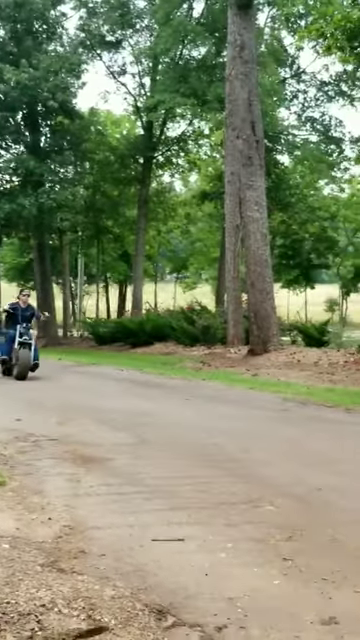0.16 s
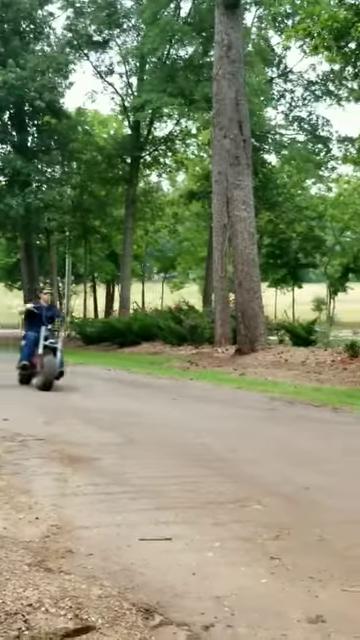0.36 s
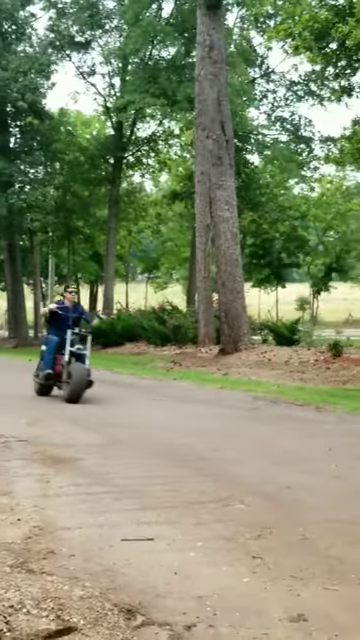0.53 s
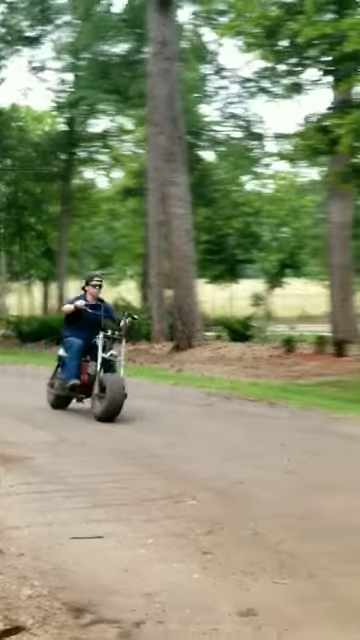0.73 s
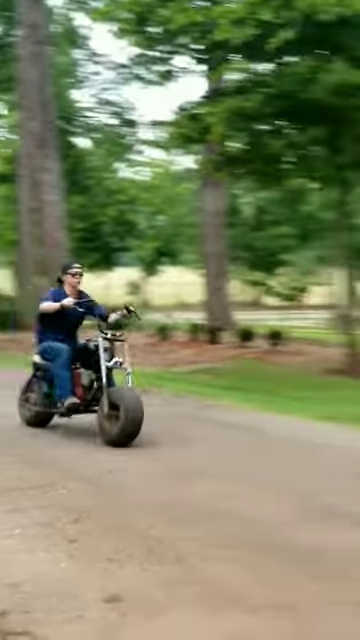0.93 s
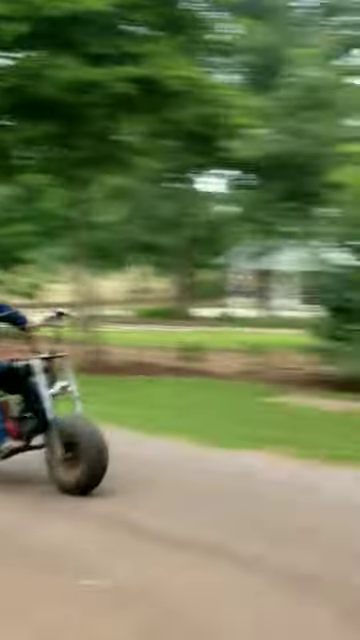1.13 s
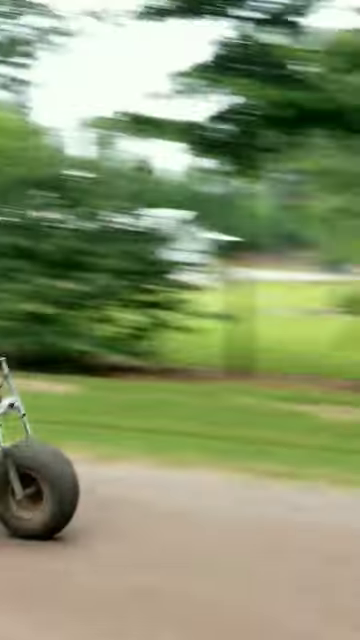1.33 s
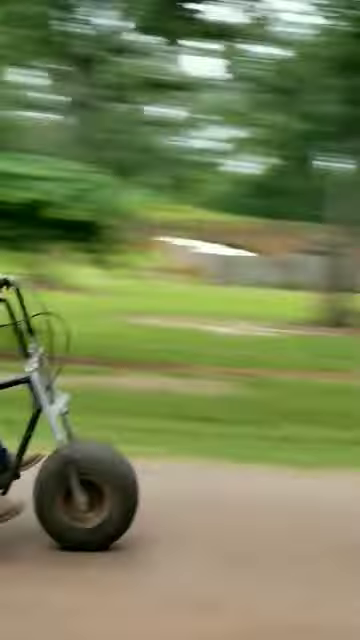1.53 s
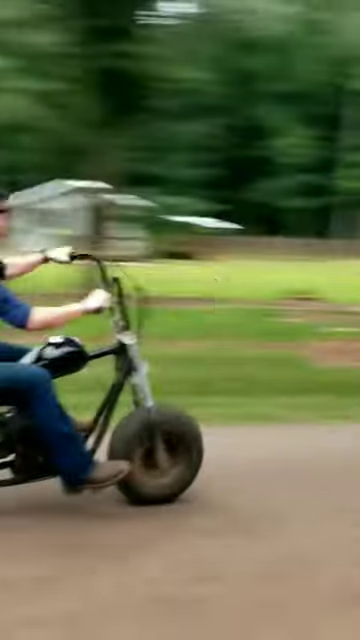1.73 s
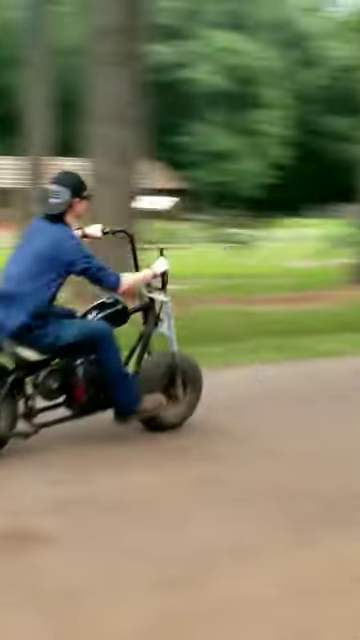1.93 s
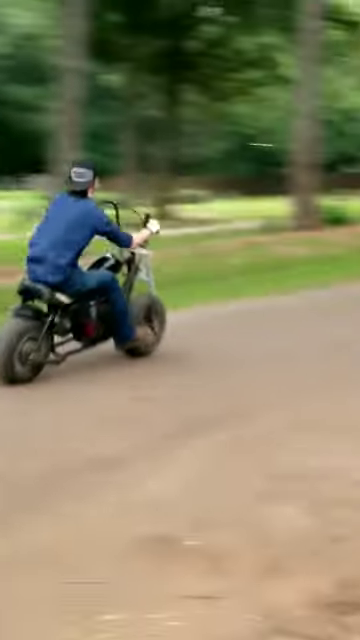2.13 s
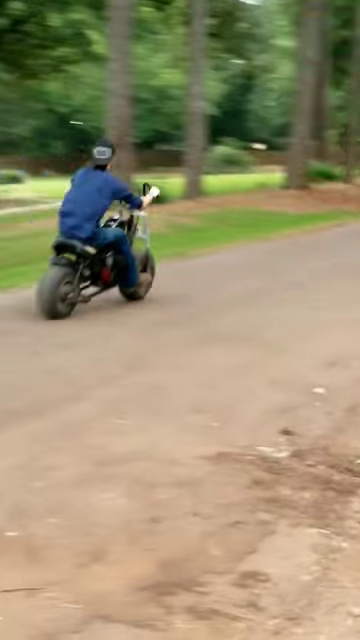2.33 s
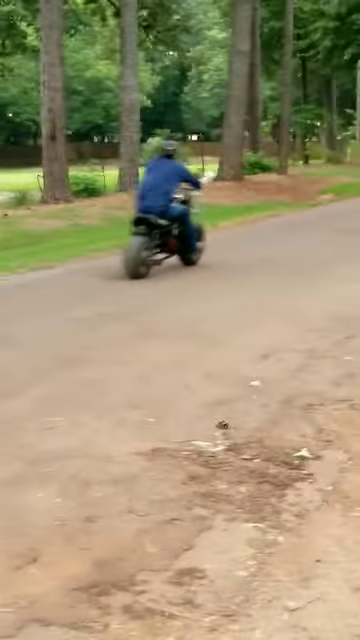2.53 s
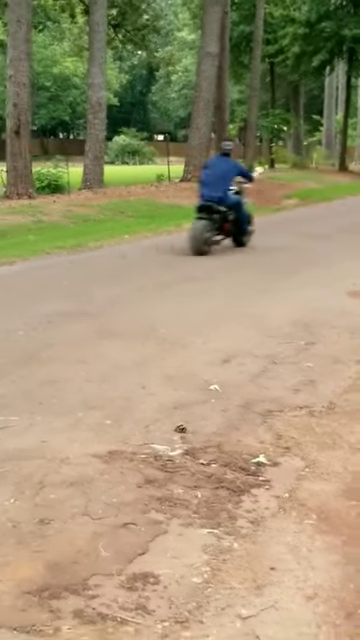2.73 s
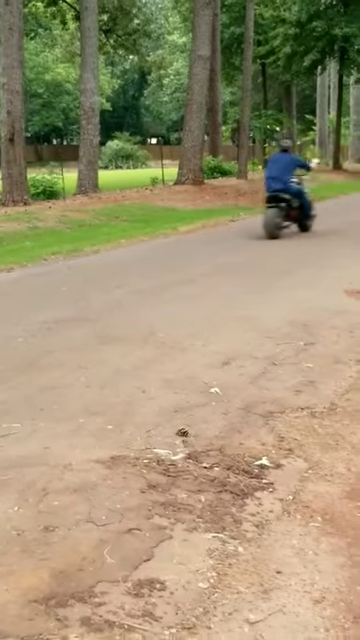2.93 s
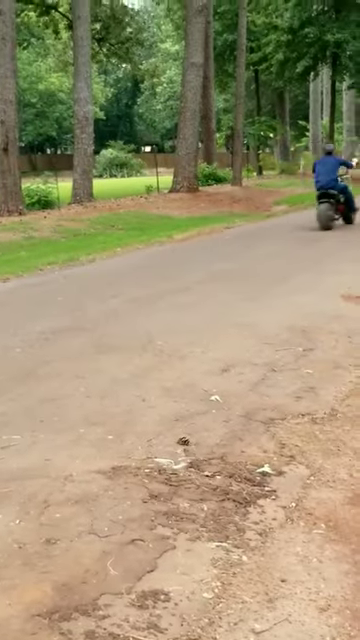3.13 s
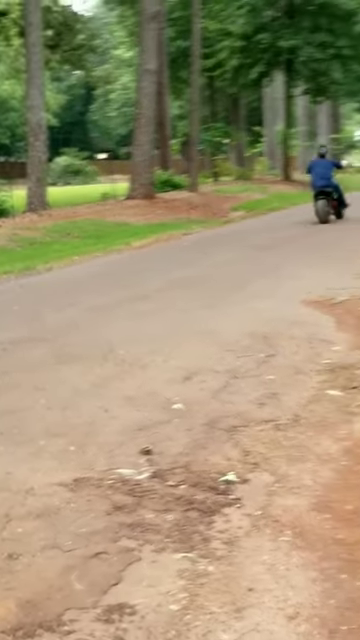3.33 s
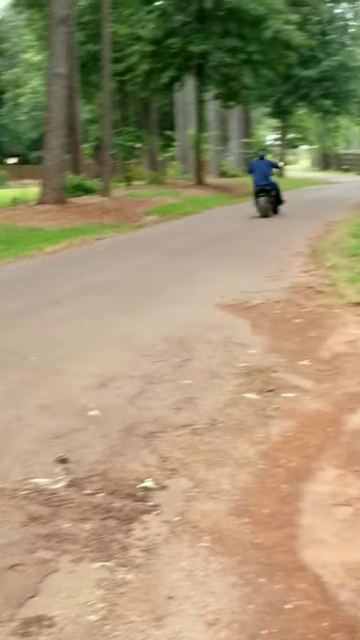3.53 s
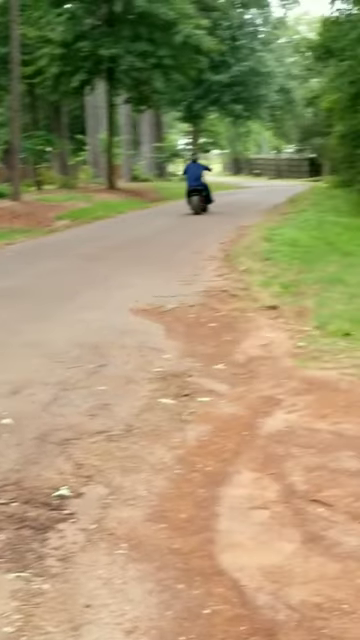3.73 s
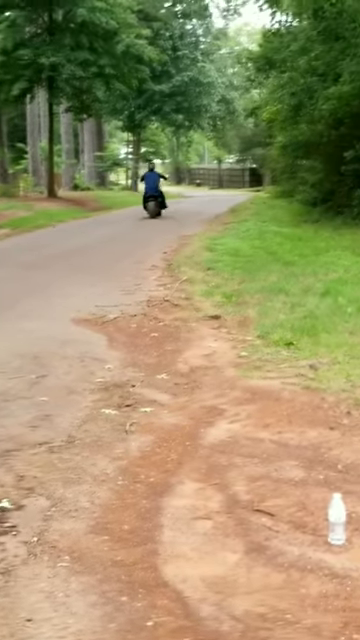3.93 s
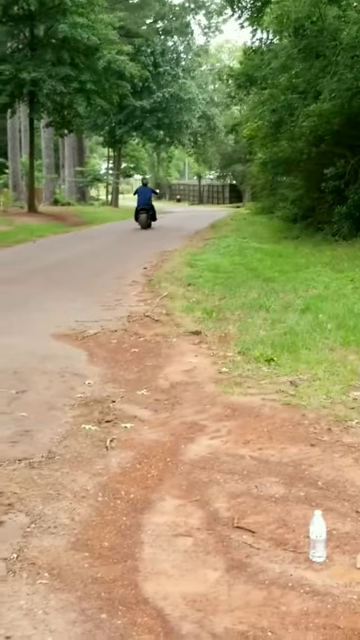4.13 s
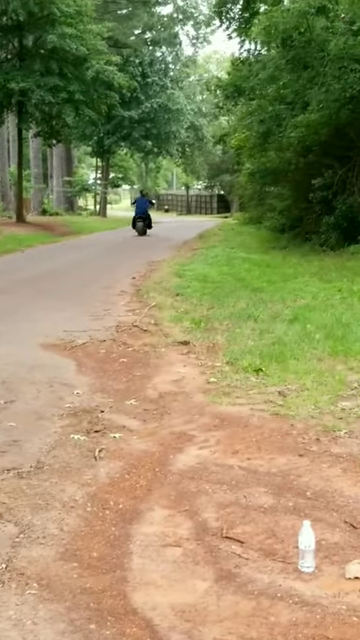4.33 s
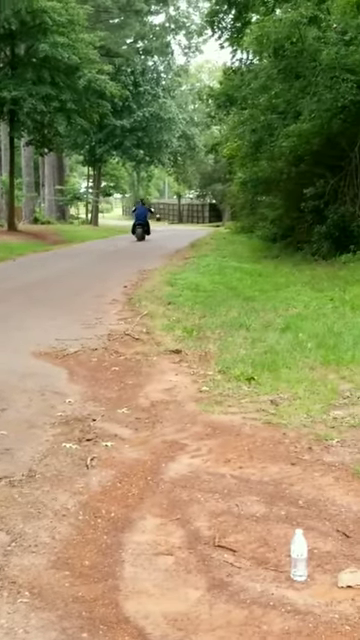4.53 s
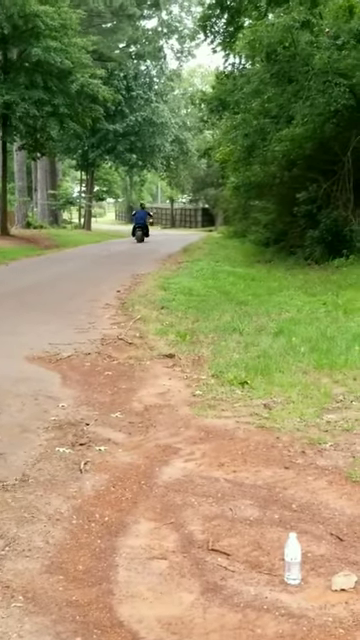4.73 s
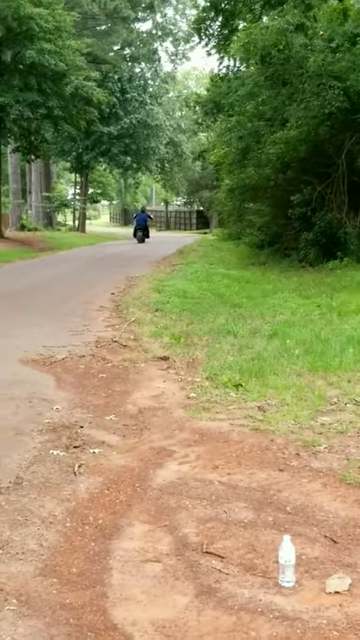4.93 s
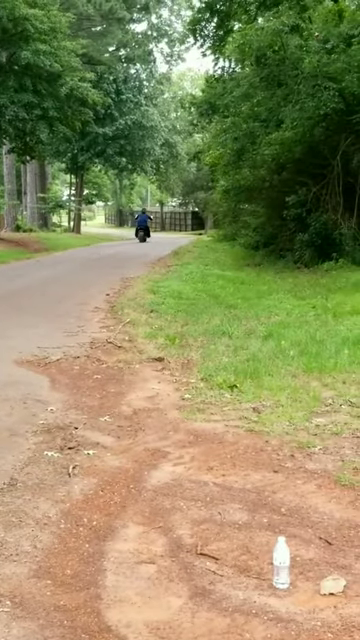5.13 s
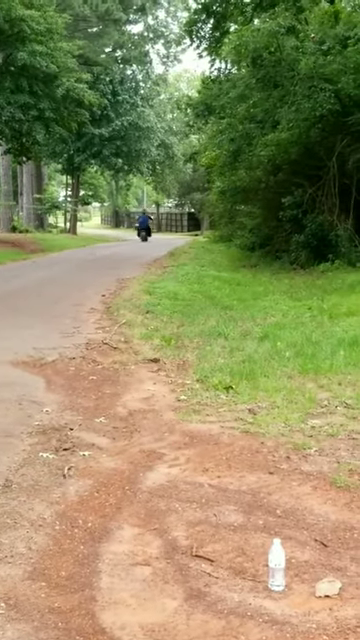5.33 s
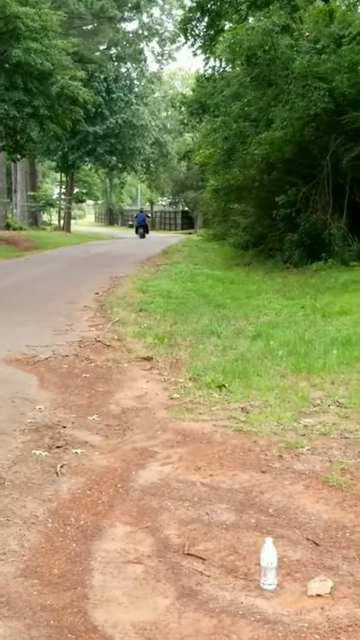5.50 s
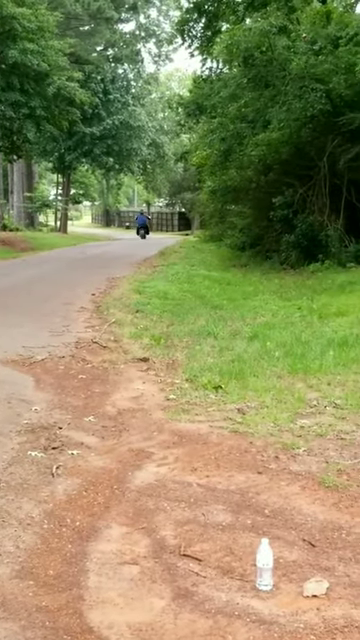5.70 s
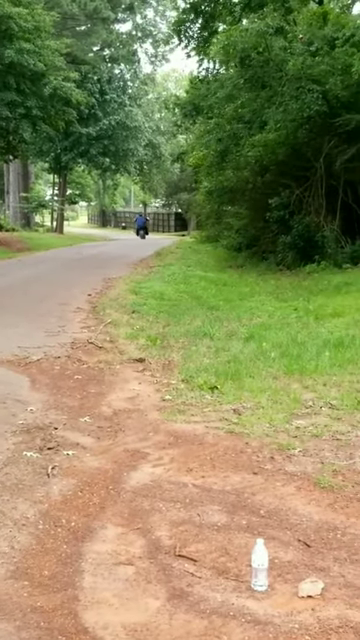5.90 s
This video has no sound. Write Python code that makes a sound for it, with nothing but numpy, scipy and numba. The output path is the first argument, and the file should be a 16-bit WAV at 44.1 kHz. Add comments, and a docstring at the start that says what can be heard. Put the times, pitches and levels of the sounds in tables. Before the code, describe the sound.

Outdoors on a lane among trees, a small single-cylinder mini bike approaches at nearly steady speed with hum, clatter, whirr and intake growl. It passes about two metres away at two seconds, then the exhaust takes over with thuds, rough cracks and thin metallic pings. It dips, then revs slightly higher into the distance. A phone microphone picks up faint low wind, brighter on the left and muffled on the right.

```python
"""Mini bike passing along a lane

A single-cylinder four-stroke mini bike approaches, passes and rides away along a lane between trees.
Firing pulses ring a thud and a bark in the exhaust, gate puffs of gas noise and make thin metal ping;
from the front the silencer can rings over crankcase hum, intake growl, clatter and whirr.
The road mirrors the treble, trunks echo the exhaust and the phone body shades the pass.
Light wind touches both microphone ports; the right one is half covered."""
import sys
import numpy as np
from scipy import signal
from scipy.fft import rfft, irfft
from scipy.io import wavfile
from scipy.ndimage import uniform_filter1d
from numba import njit

SR = 44100
rng = np.random.default_rng(int(sys.argv[2]) if len(sys.argv) > 2 else 0)


def gain_from_decibels(decibels):
    """Convert decibel values to linear amplitude factors."""
    exponent = np.asarray(decibels, float) / 20
    return 10 ** exponent


def transcribe(u):
    """Save the signal u as a 16-bit wav file named by the first command-line argument.

    u: samples, shape (n,) or (channels, n), limited to [-1, 1]; the rate is SR.
    q: integer samples, one column per channel.
    """
    v = np.clip(np.atleast_2d(u).T, -1, 1)
    q = np.round(v * 32767).astype(np.int16)
    wavfile.write(sys.argv[1], SR, q)


N = 262836
KERB_M = 2.1  # distance at the closest point

# spectrum of the exhaust gas noise: f/Hz, relative level/dB
PUFF_SPECTRUM = [(700, -73.5), (1300, -3.5), (1750, -11.5), (2600, 2.5), (7000, -1), (14000, 2.5),
                 (16000, -25)]


def level(x):
    """Scale to rms 1."""
    return x / np.sqrt(np.mean(x ** 2))


def timeline(rows):
    """Every column after the time column, interpolated to each sample."""
    s, *columns = np.transpose(rows)
    return [np.interp(np.arange(N) / SR, s, column) for column in columns]


def swing(front, rear, at_s=2.2, ease_s=0.25):
    """S-curve from front to rear value; by default it follows the tail pipe swinging into view."""
    t = np.arange(N) / SR
    return front + (rear - front) / (1 + np.exp((at_s - t) / ease_s))


def hide(front, rear):
    """S-curve for sounds of the engine, which rider and frame cover as the bike passes."""
    return swing(front, rear, at_s=2.3, ease_s=0.14)


def colour(x, points):
    """Causal filter through (Hz, dB) points, from the cepstrum of the log gain."""
    hz, db = np.transpose(points)
    log_gain = np.interp(np.log(np.linspace(1, SR / 2, 2049)), np.log(hz), db) * np.log(10) / 20
    cepstrum = irfft(log_gain)
    # folding the second half onto the first makes the filter minimum-phase
    cepstrum[1:2048] *= 2
    cepstrum[2049:] = 0
    return signal.fftconvolve(x, irfft(np.exp(rfft(cepstrum))))[:N]


def hiss(points):
    """Coloured noise of rms 1."""
    return level(colour(rng.standard_normal(N), points))


def ring(x, modes):
    """Damped sines started by every pulse, from (Hz, width Hz, dB) modes, together at rms 1."""
    total = 0
    for hz, width, db in modes:
        pole = np.exp((2j * hz - width) * np.pi / SR)
        total = total + gain_from_decibels(db) * signal.lfilter([1], [1, -pole], x).imag
    return level(total)


def late(x, lag_s):
    """Read the sound a fixed or moving time ago."""
    return np.interp(np.arange(N) - lag_s * SR, np.arange(N), x)


def walk(rate):
    """Random levels of rms 1, held 1 / rate s and slewed twice."""
    k = int(SR / rate)
    steps = np.repeat(rng.standard_normal(N // k + 1), k)
    return level(uniform_filter1d(uniform_filter1d(steps, k), k)[:N])


@njit
def svf(x, hz, peak):
    """State-variable filter with a moving centre: low-pass and band-pass."""
    y, b, l = np.empty((2, len(x))), 0., 0.
    for i in range(len(x)):
        g = np.tan(np.pi * hz[i] / SR)
        v = (b + g * (x[i] - l)) / (1 + g * (g + 1 / peak))
        y[0, i], y[1, i] = l + g * v, v / peak
        b, l = 2 * v - b, 2 * y[0, i] - l
    return y


def low_pass(x, hz, peak):
    """Low-pass with a moving edge."""
    return svf(x, hz, peak)[0]


def crank():
    """Firings so far at every sample: the integral of the engine speed."""
    # engine speed as heard: t/s, firing rate/Hz
    engine_speed = [(0, 31.918), (.5, 31.794), (1.2, 32.053), (2, 32.061), (2.45, 31.939), (2.7, 32.52),
                    (3.4, 32.659), (4.5, 34.058), (5, 34.022), (5.5, 34.844), (6, 34.845)]
    rate, = timeline(engine_speed)
    fired_at_start = 1.027
    return fired_at_start + np.cumsum(rate) / SR


def pulses(scatter_db, jitter_s):
    """One click a firing, split over two samples, each with its own size and moment."""
    count = crank()
    firing = np.arange(np.ceil(count[0]), count[-1])
    chance = rng.standard_normal((len(firing), 2))
    at = np.interp(firing, count, np.arange(N)) + jitter_s * SR * chance[:, 0]
    at = np.clip(at, 0, N - 2)
    size = gain_from_decibels(scatter_db * chance[:, 1])
    out = np.zeros(N)
    out[at.astype(int)] = size * (1 - at % 1)
    out[at.astype(int) + 1] = size * (at % 1)
    return out


def burst(x, rise_s):
    """Envelope that swells for rise_s and dies after every pulse."""
    t = np.arange(int(.02 * SR)) / SR / rise_s
    return signal.fftconvolve(x, t ** 2 * np.exp(-2 * t))[:N]


def exhaust(body_db, bark_db, puff_db):
    """A sharp bark, then the suction thud; turbulent gas rides on the blast and the can rings."""
    # resonances rung by each firing, all: f/Hz, width/Hz, relative level/dB
    thud_modes = [(169.5, 45.4, 8.5), (249.5, 160, 12), (352, 33, -12.5)]
    boom_modes = [(105, 20, 0)]
    can_modes = [(191.7, 45, 0), (53.7, 4.9, 0)]
    bark_modes = [(652, 283, 8), (1270, 99, -11.5), (2300, 1200, 0.5)]
    fire = pulses(scatter_db=0.54, jitter_s=.00004)
    thud = gain_from_decibels(body_db + swing(-9.5, 2)) * ring(fire, thud_modes)
    boom = gain_from_decibels(body_db + swing(-40, -21, at_s=1.7, ease_s=.3)) * ring(fire, boom_modes)
    can = gain_from_decibels(body_db + hide(-11, -28)) * ring(pulses(scatter_db=1.5, jitter_s=0.0001), can_modes)
    lag_s = swing(.0022, .0011)  # longer way round from the front
    suction = -late(thud + boom + can, lag_s)
    bark = gain_from_decibels(bark_db) * ring(fire, bark_modes)
    blast = burst(pulses(scatter_db=1.0, jitter_s=0.00081), rise_s=0.0018)
    puff = gain_from_decibels(puff_db) * level(blast * hiss(PUFF_SPECTRUM))
    return suction + knock(fire) + bark + puff


def pings(modes):
    """Thin exhaust metal: every blast strikes each mode with its own force."""
    total = 0
    for hz, width, db in modes:
        blast = burst(pulses(scatter_db=3.2, jitter_s=0.000068), rise_s=0.00066)
        total = total + gain_from_decibels(db) * ring(blast * hiss(PUFF_SPECTRUM), [(hz, width, 0)])
    return level(total)


def metal(low_db, high_db):
    """Low and high pings of the thin exhaust metal, each group at its own level."""
    # resonances of the metal: f/Hz, width/Hz, relative level/dB
    ping_modes = [(1386, 194, 4), (1985, 130, 4.5), (2570, 136, 6.5), (3180, 147, 3), (4100, 2300, 6.5),
                  (4900, 200, -6), (7100, 67, -20), (7700, 700, -1), (9760, 230, -4.5), (11970, 270, 2)]
    split_hz = 3500
    low = pings([mode for mode in ping_modes if mode[0] < split_hz])
    high = pings([mode for mode in ping_modes if mode[0] > split_hz])
    return gain_from_decibels(low_db) * low + gain_from_decibels(high_db) * high


def growl():
    """Air noise in a moving intake resonance, throbbing twice a cycle, heard from the front."""
    # intake resonance: t/s, mean centre f/Hz, mean level/dB
    intake = [(0, 650, -38.5), (.25, 660, -45), (.8, 720, -38), (1.05, 740, -35), (1.33, 780, -33),
              (1.47, 710, -52), (1.801, 826, -34.5), (2.1, 795, -56), (2.5, 780, -50)]
    hz, db = timeline(intake)
    air = np.diff(rng.standard_normal(N + 1), 2, prepend=0.)  # noise tilted towards the treble
    centre = hz * (1 + 0.068 * walk(10.16))
    throat = level(low_pass(low_pass(air, centre, 2.4), centre, 2.4))
    throb_db = -6.5 * np.cos(4 * np.pi * crank())
    return gain_from_decibels(db + throb_db + 1.8 * walk(24.13)) * throat


def patchy(x, patchy_db, rate):
    """Moving air lets each band fade and return alone."""
    # borders between the bands: f/Hz
    band_edges = [1800, 2700, 3800, 5200, 7000, 10000]
    lows = [0 * x]
    for hz in band_edges:
        lows.append(signal.sosfiltfilt(signal.butter(2, hz, fs=SR, output="sos"), x))
    lows.append(x)
    return sum(gain_from_decibels(patchy_db * walk(rate)) * band for band in np.diff(lows, axis=0))


def engine(body_db, whirr_db):
    """Valve gear and casing rattle with beats once and twice a cycle; cooling fan and chain hiss on."""
    # noise spectra, both: f/Hz, relative level/dB
    clatter_spectrum = [(59, -26), (100, -8.5), (193, -7), (257, -8.5), (389, -11), (454, -13.5),
                        (669, -16), (1070, -20), (1380, -13), (2200, -20), (2860, -52)]
    whirr_spectrum = [(1000, -31.5), (2000, 4), (2800, 5), (4000, 2), (5500, -1.5), (7400, -3.9),
                      (11000, -3.3), (14000, 1.8), (16000, 6.67)]
    turn = 4 * np.pi * crank()  # two beats a firing
    beat_db = 0.2 * np.cos(turn - .6) + 0.33 * np.cos(turn / 2 - .4)
    # the open side of the engine turns away
    clatter_db = body_db + swing(-4.5, -11, at_s=2.34, ease_s=0.091)
    clatter = gain_from_decibels(clatter_db + beat_db + 2.43 * walk(60)) * hiss(clatter_spectrum)
    air = patchy(hiss(whirr_spectrum), swing(.4, 1.6), rate=15.0)
    return clatter + gain_from_decibels(whirr_db + 0.21 * beat_db + 1.8 * walk(90)) * air


def hum():
    """Crankcase tones on multiples of the firing rate, swelling and sagging slowly."""
    # multiple of the firing rate: relative level far off/dB, relative level close by/dB
    hum_orders = {2: (-4, -4), 3: (-15, -10), 4: (-7.5, -9), 5: (-16, -17), 6: (1.8, 1.8), 12: (-12.5, -9)}
    turn = 2 * np.pi * crank()
    tones = 0
    for order, (far_db, close_db) in hum_orders.items():
        tone_db = swing(far_db, close_db, at_s=0.45) + 0.6 * walk(3.35)
        tones = tones + gain_from_decibels(tone_db) * np.sin(order * turn)
    return -level(late(tones, .0017))


def road(bike, metres):
    """A rough road mirrors only the treble cleanly enough to comb it; the detour shrinks with distance."""
    treble = signal.sosfilt(signal.butter(1, 900, "high", fs=SR, output="sos"), bike)
    detour_ms = 0.48 * KERB_M / metres
    return 0.071 * late(treble, detour_ms / 1000)


def trees(x, t60_s):
    """Single trunks answer at sliding lags; the wood behind returns a dull tail."""
    # trunk echoes: lag at the start/ms, lag at the end/ms, relative level/dB
    trunk_echoes = [(69, 8.4, -30), (93.85, 37, -13), (30.66, 31, -16)]
    t = np.arange(int(.8 * SR)) / SR
    tail = rng.standard_normal(len(t)) * gain_from_decibels(-60 * t / t60_s) * (t > .012)
    wood = signal.fftconvolve(x, tail / np.sqrt(np.sum(tail ** 2)))[:N]
    trunks = sum(gain_from_decibels(db) * late(x, np.linspace(ms0, ms1, N) / 1000) for ms0, ms1, db in trunk_echoes)
    return colour(wood + gain_from_decibels(4.0) * trunks, [(100, 6.0), (900, 4.0), (4000, -2.5), (15000, -23)])


def shadow(x, metres):
    """Side-on, the phone body takes away the treble between a moving edge and the top octave."""
    reach_m, shadow_db, top_shadow_db = 4.64, 12.5, 5.5
    edge_top_hz, top_hz = 8050, 11410
    side = 1 / (1 + (metres / reach_m) ** 6)
    # the shadow's lower edge climbs as the bike leaves the side
    edge = edge_top_hz * np.tanh(1843 * metres / edge_top_hz)
    low = low_pass(low_pass(x, edge, 1.66), edge, 1.66)
    low = low_pass(low, np.full(N, float(edge_top_hz)), 0.54)
    band = signal.sosfilt(signal.ellip(4, .5, 50, [edge_top_hz, top_hz], "band", fs=SR, output="sos"), x)
    top = signal.sosfilt(signal.ellip(4, .5, 50, top_hz, "high", fs=SR, output="sos"), x)
    # some treble creeps round the phone body
    creep = signal.sosfilt(signal.butter(4, (4600, 6700), "band", fs=SR, output="sos"), x)
    leak = gain_from_decibels(-21) * KERB_M / metres * creep
    # the top octave bends round; air wears it down by 0.4 dB per metre
    top_db = -top_shadow_db * side - 0.4 * metres
    return low + leak + gain_from_decibels(-shadow_db * side) * band + gain_from_decibels(top_db) * top


def notch(x, metres):
    """A narrow gap above the thud, closed side-on."""
    hz, width_hz = 433.7, 34
    b, a = signal.iirpeak(hz, hz / width_hz, fs=SR)
    return x - 0.98 * (1 - KERB_M / metres) * signal.lfilter(b, a, x)


def gap(x):
    """Take out a second narrow band that slides up as the bike leaves."""
    # sliding gap: t/s, centre f/Hz, share removed/1
    sliding_gap = [(2.3, 350, 0.8), (2.6, 349, .8), (3.2, 360, 0.7), (3.6, 400, 0.7), (4.0, 420, 0),
                   (4.4, 440, 0)]
    hz, share = timeline(sliding_gap)
    return x - share * svf(x, hz, 10.7)[1]


def wind():
    """Low rumble of light wind: one part shared by the ports, a smaller one at each."""
    # wind noise spectrum: f/Hz, relative level/dB
    wind_spectrum = [(15, 21), (30, 25), (50, -10), (100, -48)]
    own = np.array([hiss(wind_spectrum), hiss(wind_spectrum)])
    return gain_from_decibels(-57) * (hiss(wind_spectrum) + 0.17 * own)


def knock(fire):
    """A short dip in pressure between two small swells at each firing, loudest at 2 s."""
    hz, width_s, lag_s = 279, 0.0013, 0.002
    t = np.arange(int(-.01 * SR), int(0.00997 * SR) + 1) / SR - lag_s
    dip = -np.cos(2 * np.pi * hz * t) * np.exp(-(t / width_s) ** 2 / 2)
    # 9 dB down at 0.37 s either side of the peak
    db = -23 - 9 * ((np.arange(N) / SR - 2) / 0.37) ** 2
    return gain_from_decibels(db) * level(signal.fftconvolve(fire, dip, "same"))


def cracks():
    """The loudest cracks of the blast: short rough bursts, each centred on its own pitch."""
    # cracks: t/s, envelope peak level/dB, f/Hz
    crack_list = [(2.095, -13.5, 4420), (2.1264, -13, 3520), (2.158, -10, 3240), (2.2205, -13.5, 3920),
                  (2.252, -19, 4830), (2.312, -16, 4600), (2.343, -11.5, 2590), (2.376, -16, 4600),
                  (2.4079, -27, 6040), (2.439, -16, 4200), (2.4703, -18, 5980), (2.5017, -15.5, 6150),
                  (2.6584, -18, 4300), (2.687, -19, 4230), (2.7801, -13, 4800), (2.873, -25, 7540),
                  (2.9634, -18, 5270), (2.9953, -15.5, 6740), (3.0254, -20, 4520), (3.301, -19.5, 6370),
                  (3.331, -21, 6700), (3.363, -22, 6400), (3.3947, -19, 2640), (3.5772, -18.5, 2500),
                  (3.8491, -21.5, 7500), (3.9102, -11.5, 2510), (3.9985, -19, 2560), (4.825, -16.5, 3040),
                  (5.3233, -17, 7350)]
    rise_s, roughness = 0.0019, 0.21
    out, t = np.zeros(N), np.arange(int(.008 * SR)) / SR
    shape = (t / rise_s * np.exp(1 - t / rise_s)) ** 2
    for s, db, hz in crack_list:
        wander = np.cumsum(roughness * rng.standard_normal(len(t))) / 2
        start = int(s * SR)
        out[start:start + len(t)] += gain_from_decibels(db) * shape * np.sin(2 * np.pi * hz * t + wander)
    return out


def scene():
    """Bike, its image in the road and the trees, the same at both ports; wind differs."""
    # ride levels: t/s, reference level of the bike body/dB, mean level of its treble hiss/dB
    ride_levels = [(0, -26.5, -27.5), (.3, -26.5, -25), (.75, -23.5, -23), (1.3, -22, -22),
                   (1.7, -23.5, -22), (2.0, -21.5, -32.5), (2.3, -25, -28), (2.7, -28, -31),
                   (3.4, -34, -34.5), (3.9, -31, -32.5), (4.35, -28, -29.5), (5.2, -30, -29),
                   (5.96, -27, -29.5)]
    # exhaust blast: t/s, gas puff level/dB, bark level/dB, low ping level/dB, high ping level/dB
    blast_levels = [(0, -49, -72, -37, -51), (.7, -39, -74, -41, -47), (1.3, -30, -67, -31, -58),
                    (1.7, -36, -56, -35, -32), (2.0, -32, -47, -34, -50), (2.3, -32, -42, -33.5, -35.5),
                    (2.49, -30, -37, -30.5, -40), (2.58, -29.5, -39, -48, -37.5),
                    (2.7, -33.5, -32, -43, -34), (3.2, -37, -35.5, -37.5, -41.5),
                    (3.9, -38.5, -32.5, -32, -36.5), (4.4, -68, -29, -34, -36), (4.85, -42, -31, -38, -36),
                    (5.2, -35, -31, -40, -40), (5.96, -47, -29, -46, -39)]
    body_db, treble_db = timeline(ride_levels)
    puff_db, bark_db, low_db, high_db = timeline(blast_levels)
    closest_s, speed_m_s = 2.0, 8.2
    metres = np.hypot(KERB_M, speed_m_s * (np.arange(N) / SR - closest_s))
    bike = exhaust(body_db, bark_db, puff_db) + metal(low_db, high_db)
    bike = bike + growl() + engine(body_db, treble_db)
    near = bike + gain_from_decibels(body_db + hide(0.5, -36)) * hum() + road(bike, metres)
    echoes = gain_from_decibels(hide(-4.5, -17.5)) * trees(bike, t60_s=0.78)
    heard = shadow(near + echoes, metres) + cracks()
    return gap(notch(heard, metres)) + wind()


def top_cut(x):
    """Nothing passes above the cut-off."""
    return signal.sosfilt(signal.butter(12, 15940, fs=SR, output="sos"), x)


def record(dry):
    """The open port is bright; the covered one is muffled and gets its treble by scattered paths."""
    # response of the open port: f/Hz, gain/dB
    open_port = [(30, -18.5), (60, -1.5), (95, -3), (135, 0), (190, 0), (380, 4.5), (800, 5), (2000, -2.5),
                 (7600, 5.5), (8700, -0.5), (11000, 1), (14300, 12), (14800, -3), (15600, -43),
                 (20000, -73)]
    # loss under the cover: f/Hz, level below the open port/dB
    cover_loss = [(15, -2), (60, .3), (200, 1), (390, 0), (455, 3), (535, 16), (650, 10.5), (760, 9),
                  (900, 4), (1080, 8), (1400, 17), (1940, 15), (2800, 16.5), (4300, 24), (6500, 35),
                  (8600, 45), (11800, 28), (15000, 28)]
    left = colour(dry[0], open_port)
    t = np.arange(int(0.033 * SR)) / SR
    scatter = rng.standard_normal(len(t)) * np.exp(-t / 0.008)
    scatter = scatter / np.sqrt(np.sum(scatter ** 2))
    whole = colour(dry[1], open_port)
    low = signal.sosfiltfilt(signal.butter(2, 1500, fs=SR, output="sos"), whole)
    through = low + signal.fftconvolve(whole - low, scatter)[:N]
    right = colour(through, [(hz, -db) for hz, db in cover_loss])
    mix = np.tanh(0.67 * np.array([left, right])) / 0.76  # soft limiting
    return top_cut(mix)


dry = scene()
out = record(dry)
transcribe(out)
```